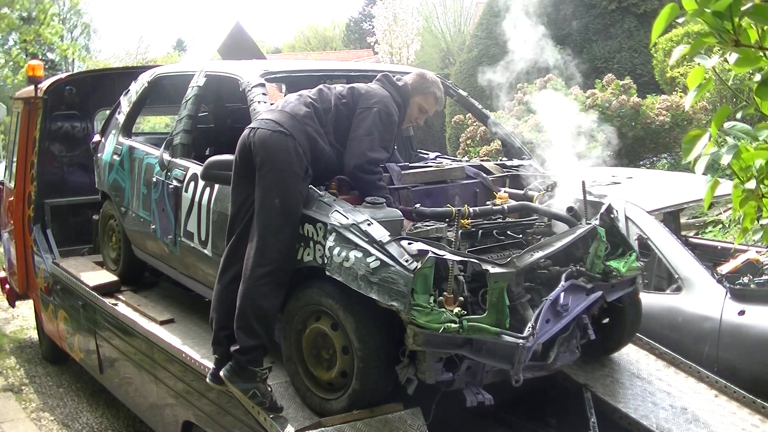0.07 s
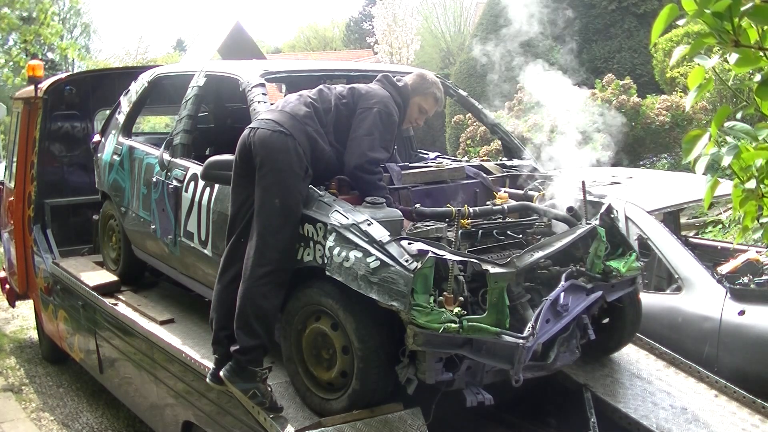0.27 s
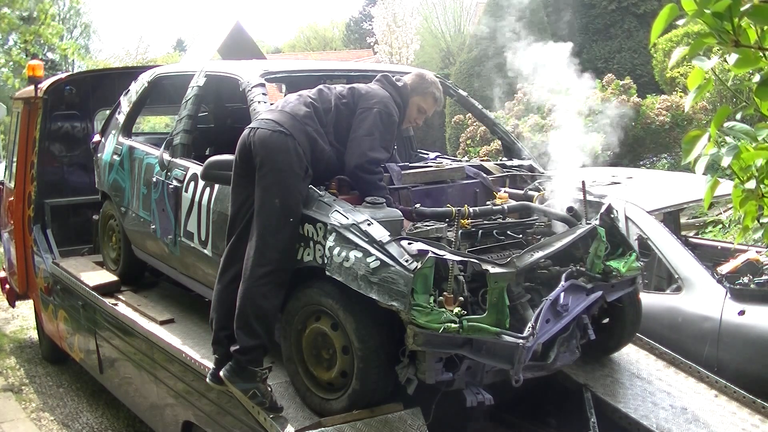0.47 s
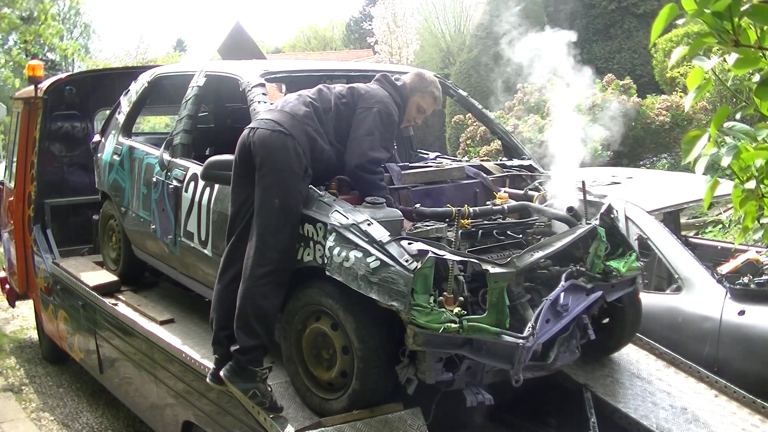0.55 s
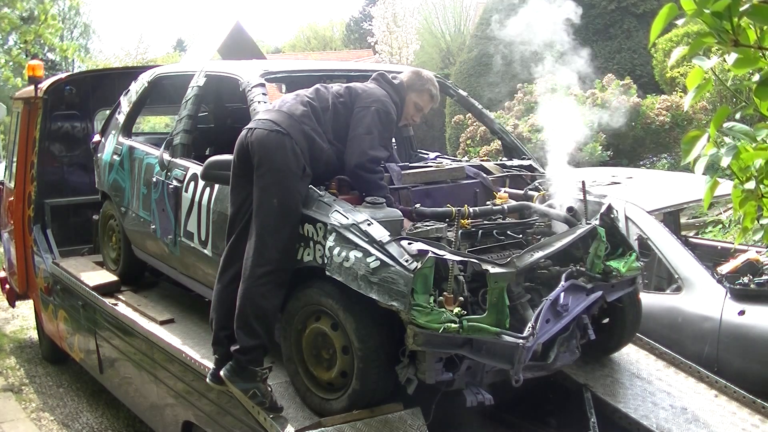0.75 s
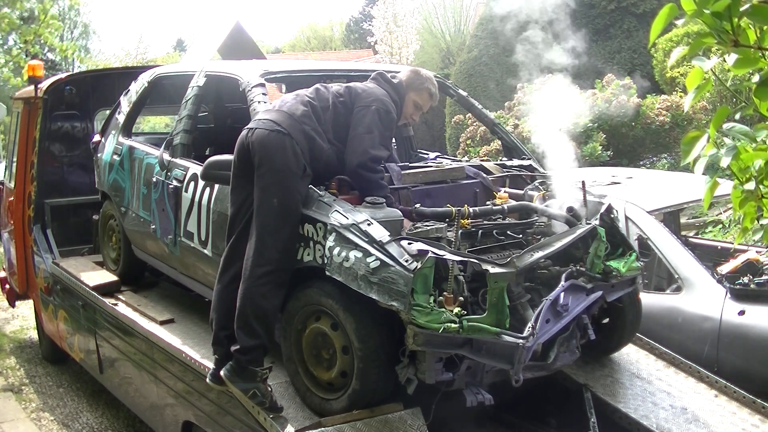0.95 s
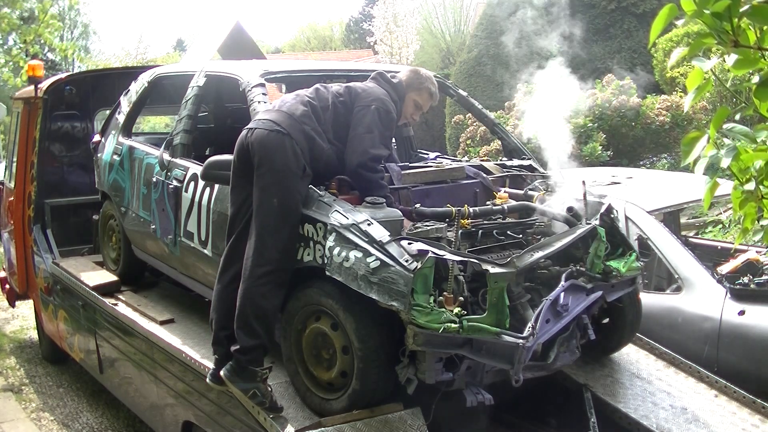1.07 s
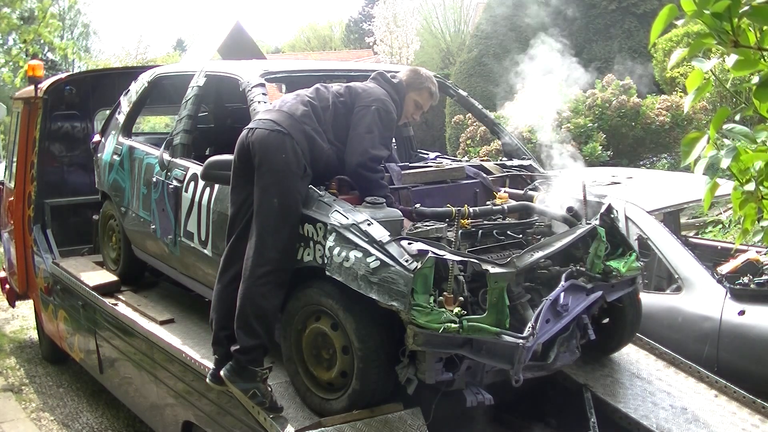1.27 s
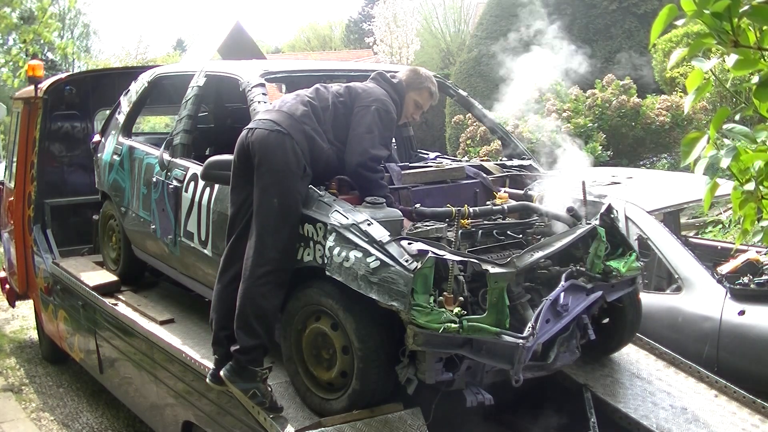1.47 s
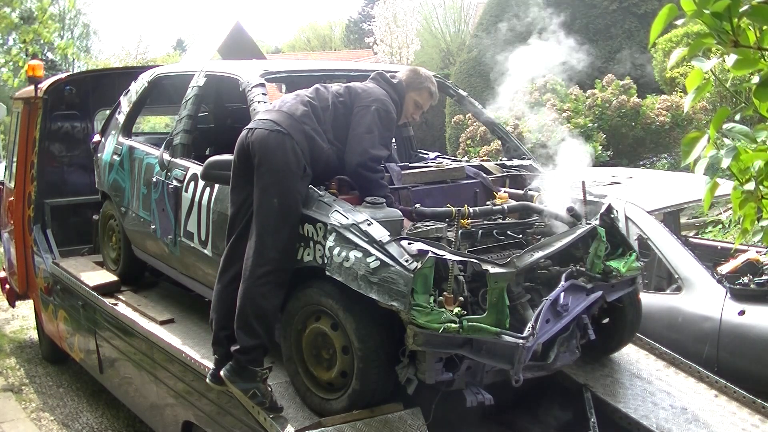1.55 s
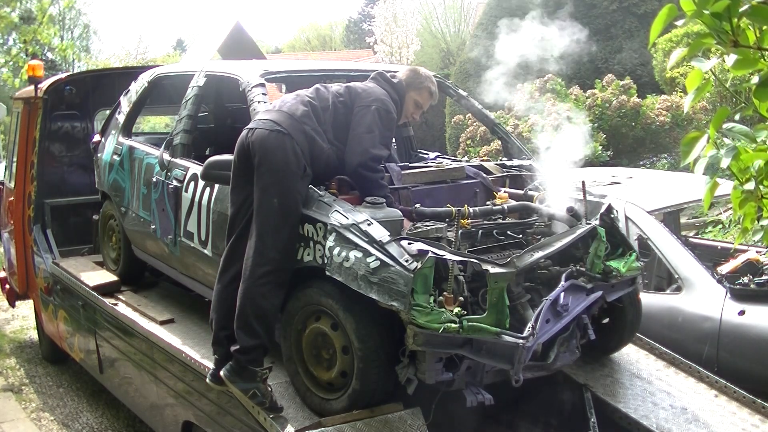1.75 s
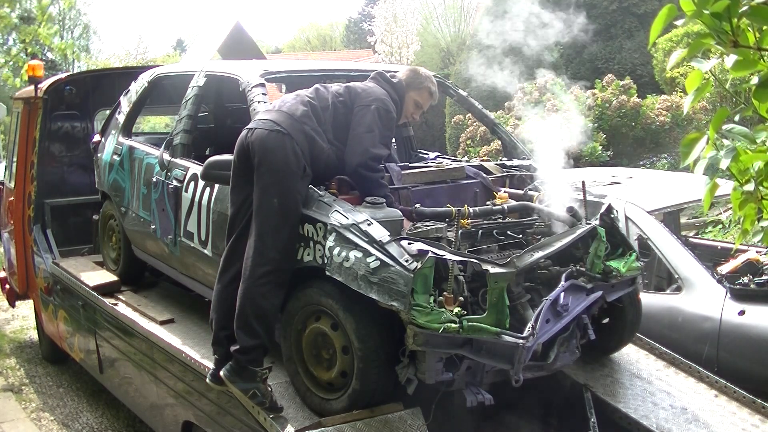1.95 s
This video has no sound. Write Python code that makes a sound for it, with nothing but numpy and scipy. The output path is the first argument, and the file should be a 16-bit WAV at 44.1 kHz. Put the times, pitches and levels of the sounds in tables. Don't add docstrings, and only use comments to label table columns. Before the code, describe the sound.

A worn car engine is cranked without catching. Quiet outdoor air until 0.2 s, when the starter gear slams in with a hard bright crack. From 0.35 s to about 1.6 s, uneven bursts of tooth scraping, dull block clanks, hard blows and brief squeals ride over a low labouring whirr and soft compression thuds. The clatter weakens, nearly dropping away around 1.9 s, then faintly resumes. Slight yard echo, close stereo.

```python
import sys
import numpy as np
from scipy import signal
from scipy.fft import rfft, irfft, next_fast_len
from scipy.io import wavfile
from scipy.ndimage import uniform_filter1d, map_coordinates

SR = 44100
rng = np.random.default_rng(int(sys.argv[2]) if len(sys.argv) > 2 else 0)


def to_linear_factor(level_db):
    exponent = np.asarray(level_db, float) / 20
    return 10 ** exponent


def file_out(sig):
    cols = np.atleast_2d(sig).T
    lim = np.clip(cols, -1, 1)
    pcm = np.round(lim * 32767).astype(np.int16)
    wavfile.write(sys.argv[1], SR, pcm)


N = 88200
T = np.arange(N) / SR


def unit(x):
    return x / np.sqrt(np.mean(x ** 2) + 1e-20)


def along(points, hz):
    f, v = np.transpose(points)
    return np.interp(np.log(hz + 1), np.log(f + 1), v)


def wobble(rate):
    knots = rng.standard_normal(int(N * rate / SR) + 4)
    return map_coordinates(knots, [T * rate])


def filtered(x, response):
    m = next_fast_len(N + SR // 2)
    hz = np.fft.rfftfreq(m, 1 / SR)
    return irfft(rfft(x, m) * response(hz), m)[..., :N]


def coloured(x, colour):
    return filtered(x, lambda hz: to_linear_factor(along(colour, hz)))


def shape(t, rise, hold, t60):
    release = np.clip(t - rise - hold, 0, None)
    return np.clip(t / rise, 0, 1) * to_linear_factor(-60 * release / t60)


def rattle(count, rate, spread_db, smooth):
    chance, sign, size = rng.random((3, count, SR // 2))
    hits = (chance < rate / SR) * np.sign(sign - .5) * to_linear_factor(spread_db * np.sqrt(12) * size)
    return unit(unit(hits) + smooth * rng.standard_normal(hits.shape))


def metal_body(colour, peaks, vary_db, modal_db, m):
    hz = np.fft.rfftfreq(m, 1 / SR)
    lift = sum((g + vary_db * rng.standard_normal()) / (1 + (2 * (hz - c) / w) ** 2) for c, w, g in peaks)
    dense_modes = map_coordinates(rng.standard_normal(400), [hz / 60])
    level_db = along(colour, hz) + lift + modal_db * dense_modes
    cepstrum = irfft(np.log(to_linear_factor(level_db) + 1e-6), m)
    cepstrum[1:m // 2] *= 2
    cepstrum[m // 2 + 1:] = 0
    body = np.exp(rfft(cepstrum))
    return body / np.sqrt(np.mean(abs(body) ** 2))


def struck(events, colour, peaks, rate, spread_db, smooth, vary_db, modal_db):
    m = SR // 2
    out = np.zeros(N + m)
    bursts = rattle(len(events), rate, spread_db, smooth)
    for (s, db, rise, hold, t60), burst in zip(events, bursts):
        body = metal_body(colour, peaks, vary_db, modal_db, m)
        contact = burst * shape(T[:m], rise, hold, t60)
        start = round(s * SR)
        out[start:start + m] += to_linear_factor(db) * irfft(rfft(contact) * body, m)
    return out[:N]


# (time [s], level [dB], rise [s], hold [s], t60 [s])
SLAM_HITS = [
    (.203, -19.5, 0.00074, 0.0052, 0.054),
    (.2115, -15, 0.00044, 0.0049, 0.15),
]
# (frequency [Hz], density [dB per Hz])
SLAM_TONE = [(1530, -40), (2600, -9), (3500, -8.5), (4870, 4.5), (6940, -15), (9820, -17.5), (11200, -31),
             (15800, -37)]


def slam():
    return struck(SLAM_HITS, SLAM_TONE, [], 1500, spread_db=2.5, smooth=.9, vary_db=0, modal_db=2)


# (time [s], level [dB], rise [s], hold [s], t60 [s])
TOOTH_SCRAPES = [(.346, -27, 0.00065, 0.0041, 0.12), (.375, -29, 0.0051, 0.023, 0.31),
                 (.562, -26.5, 0.0019, 0.052, 0.14), (.61, -31, 0.013, 0.062, 0.41),
                 (.702, -23, .004, 0.01, 0.55), (.822, -22.5, 0.0025, 0.021, 0.24),
                 (.953, -33.5, 0.0034, 0.033, 0.07), (.995, -27, 0.002, 0.047, 0.23),
                 (1.02, -25.5, 0.005, 0.0091, .2), (1.125, -35.5, 0.004, 0.036, 0.16),
                 (1.167, -25, 0.0033, 0.061, 0.36), (1.275, -23.5, 0.0035, 0.039, 0.44),
                 (1.396, -20.5, 0.0015, 0.0093, 0.39), (1.495, -22, 0.0012, 0.004, 0.094),
                 (1.541, -33, 0.00081, 0.0066, 0.049), (1.6, -28, 0.072, 0.014, 0.11),
                 (1.66, -32, 0.0084, 0.022, 0.42), (1.892, -37.5, 0.019, 0.0089, 0.15),
                 (1.96, -36, 0.033, 0.019, 0.17), (1.975, -34.5, 0.018, 0.018, .2),
                 (.27, -34.5, 0.014, 0.06, .2)]
# (frequency [Hz], density [dB per Hz])
TEETH_TONE = [(1500, -38), (2600, -6.5), (4800, 1), (6600, -7.5), (7300, -12.5), (10200, -17),
              (11000, -30.5), (15800, -39.5)]
# (frequency [Hz], width [Hz], lift [dB])
TEETH_MODES = [(4330, 110, -3), (3900, 93, 7)]


def scrapes():
    return struck(TOOTH_SCRAPES, TEETH_TONE, TEETH_MODES, 3000,
                  spread_db=0.5, smooth=1.0, vary_db=3.5, modal_db=3.0)


# (time [s], level [dB], rise [s], hold [s], t60 [s])
BLOCK_CLANKS = [(.203, -20, 0.009, 0.0059, 0.29), (.342, -18, 0.0024, 0.015, 0.13),
                (.375, -30.5, .01, 0.028, 0.45), (.565, -26.5, 0.0017, 0.043, 0.063),
                (.607, -24.5, 0.0033, 0.044, 0.43), (.655, -19.5, 0.015, 0.013, 0.26),
                (.705, -24, 0.0057, 0.0095, 0.75), (.815, -26, 0.0027, 0.026, 0.07),
                (.84, -26, 0.008, 0.028, 0.21), (.958, -32.5, 0.0022, 0.04, 0.037),
                (.996, -24.5, 0.0024, 0.032, 0.063), (1.035, -17.5, 0.0075, 0.03, 0.24),
                (1.17, -25.5, 0.0046, 0.04, 0.19), (1.226, -20, 0.0016, 0.012, 0.24),
                (1.28, -24.5, 0.0081, 0.053, 0.3), (1.318, -26, 0.0023, 0.0079, 0.33),
                (1.396, -23.5, 0.0016, 0.017, 0.4), (1.488, -27.5, 0.0013, 0.0035, 0.13),
                (1.541, -29, 0.0017, 0.0053, 0.15), (1.6, -30, 0.02, 0.063, 0.38),
                (1.728, -34.5, 0.00089, 0.013, 0.15), (1.798, -37, 0.0021, 0.0069, 0.073),
                (1.944, -35.5, 0.0081, .05, 0.075)]
# (frequency [Hz], density [dB per Hz])
BLOCK_TONE = [(88, -61), (150, -29.5), (500, -8), (641, -24.5), (811, -8), (953, -4.5), (1090, -7),
              (1820, 4), (5000, -11), (6500, -19), (11000, -120)]
# (frequency [Hz], width [Hz], lift [dB])
BLOCK_MODES = [(842, 90, 4.9), (1089, 37, 11.6), (1420, 47, 0.87), (1500, 130, 4.6), (1713, 27, 7.5),
               (2110, 71, 5.9), (2690, 190, 3.3)]


def clanks():
    return struck(BLOCK_CLANKS, BLOCK_TONE, BLOCK_MODES, 1500,
                  spread_db=1.5, smooth=0.78, vary_db=1.64, modal_db=3.5)


def shimmer(x):
    depth_db = 0.5
    z = signal.stft(x, nperseg=256)[2]
    patches = uniform_filter1d(rng.standard_normal(z.shape), size=2, axis=0)
    patches = unit(uniform_filter1d(patches, size=6, axis=1))
    gain_db = depth_db * patches - depth_db ** 2 / 2.7
    return signal.istft(z * to_linear_factor(gain_db), nperseg=256)[1][:N]


# (time [s], peak level [dB], pitch [Hz])
HARD_BLOWS = [(0.2125, -4.5, 3700), (0.2128, -0.5, 4820), (0.2158, -7, 4620), (0.2196, -9, 1990),
              (.2222, -5, 4270), (.2252, -12, 3900), (0.3446, -4, 2460), (0.35, -9.5, 1500),
              (.3533, -14, 2200), (.3583, -13, 4860), (.3615, -12, 2340), (0.383, -15, 2370),
              (0.659, -9, 1820), (0.667, -9, 1540), (0.667, -12, 2480), (.673, -11, 1660),
              (.679, -10, 2720), (0.683, -9.5, 2730), (0.695, -12.5, 1370), (1.044, -11, 2570),
              (1.0485, -9.5, 1350), (1.053, -10, 2030), (1.0611, -10, 1330), (1.065, -10, 2470),
              (1.069, -19, 2004), (1.0742, -10, 1280), (1.086, -17.5, 2250), (1.175, -14.5, 4800),
              (1.2271, -12, 1760), (1.282, -11.5, 2180), (1.32, -12, 2040), (1.397, -13.5, 1640),
              (1.416, -11, 2730), (1.4894, -7, 2480), (1.4928, -12, 2800), (1.498, -9, 4870),
              (1.5431, -13.5, 3280), (1.5456, -20, 1760), (1.5514, -14, 4470), (1.728, -20.5, 1710),
              (1.9462, -32, 1680), (1.985, -23.5, 3400), (1.994, -20, 2720)]


def blows():
    gain_db, crack_db, crack_t60 = -0.98, -15.01, .004
    ring_cycles, overtone, overtone_db = 26, 1.27, -5
    out, t = np.zeros(N + SR), T[:SR // 20]
    for s, db, hz in HARD_BLOWS:
        ring = np.sin(2 * np.pi * hz * t) + to_linear_factor(overtone_db) * np.sin(2 * np.pi * overtone * hz * t)
        ring = ring * shape(t, 0.00098, 0, ring_cycles / hz)
        crack = to_linear_factor(crack_db - 60 * t / crack_t60) * rng.standard_normal(len(t))
        start = round(s * SR)
        out[start:start + len(t)] += to_linear_factor(db + gain_db) * (ring + crack)

    def radiation(hz):
        return (1j * hz / (700 + 1j * hz)) ** 3 / (1 + 1j * hz / 7000) ** 2

    return filtered(out[:N], radiation)


# (time [s], pitch [Hz], level [dB], hold [s], t60 [s])
RINGING_PARTS = [(0.6, 3940, -24.5, 0.015, 0.028), (0.84, 1500, -22, 0.012, 0.069),
                 (0.84, 3900, -27.5, 0.012, 0.042), (0.95, 2600, -34, 0.023, 0.038),
                 (0.97, 1810, -15.5, 0.0087, 0.047), (0.998, 2700, -25, 0.016, 0.19),
                 (1.244, 6970, -22.5, 0.013, 0.022), (1.271, 6870, -23, 0.012, 0.078),
                 (1.485, 2750, -19, 0.0086, 0.055), (1.489, 1270, -22.5, 0.0027, 0.12),
                 (.66, 1100, -25.5, 0.034, 0.088), (.83, 1095, -31.5, 0.021, 0.072),
                 (1.95, 950, -40, 0.034, .1), (.345, 845, -32.5, 0.02, 0.11),
                 (1.04, 840, -29.5, 0.035, .12), (.812, 1500, -27, 0.011, .04),
                 (.835, 2060, -26.5, 0.017, 0.046), (1.4, 1620, -27.5, 0.027, .08),
                 (0.82, 1540, -27.5, 0.027, .06), (1.723, 1700, -34.5, .035, 0.047),
                 (0.341, 2600, -28, .006, .04), (1.722, 4800, -38, 0.031, 0.15)]


def rings():
    rise_s, wander_hz, rough_db = .004, 32, 3.5
    out = np.zeros(N)
    for s, hz, db, hold, t60 in RINGING_PARTS:
        level = to_linear_factor(db + rough_db * wobble(260)) * shape(T - s, rise_s, hold, t60)
        phase = 2 * np.pi * np.cumsum(hz + wander_hz * wobble(200)) / SR
        out += level * np.sin(phase)
    return out


# (time [s], level [dB], pitch
# [Hz])
LOW_THUDS = [(.37, -44.5, 370), (0.636, -51, 110), (0.664, -39.5, 260), (.79, -60, 110),
             (1.23, -58, 105), (1.334, -55.5, 128), (1.67, -38, 341), (.345, -41, 560),
             (.665, -41, 600), (.67, -48, 180), (1.04, -37.5, 490), (.87, -42, 545),
             (1.05, -44, 400), (.72, -46, 235), (1.37, -48, 254)]


def thuds():
    sag, t60 = 1.27, .22
    out = np.zeros(N)
    for s, db, hz in LOW_THUDS:
        t = T - s
        level = to_linear_factor(db + 2.8 * wobble(51.15)) * shape(t, 0.0029, 0.0068, t60)
        out += level * np.sin(2 * np.pi * hz * t * (1 - sag * np.clip(t, 0, .2)))
    return out


# (time [s], level [dB])
STARTER_EFFORT = [(.2, -52), (.23, -44), (.55, -39), (.68, -45), (1.5, -43), (1.6, -44.5), (1.75, -42),
                  (1.862, -53), (1.92, -58), (1.96, -45), (2, -42)]
# (frequency [Hz], density [dB per Hz])
DRONE_TONE = [(24, -60), (40, -55), (151, -34), (318, -2), (400, -9), (480, -2.5), (525, 3), (575, -10),
              (700, -9.5), (910, -47), (1540, -120)]


def whirr():
    mesh_db = 5
    drone = coloured(rng.standard_normal(N) * to_linear_factor(2.8 * wobble(41.04)), DRONE_TONE)
    friction = rng.standard_normal(N) * to_linear_factor(1.8 * wobble(62.2))
    mesh = coloured(friction, BLOCK_TONE) + 0.4 * coloured(friction, TEETH_TONE)
    s, db = np.transpose(STARTER_EFFORT)
    effort = to_linear_factor(np.interp(T, s, db, left=-120) - 2.5)
    return effort * (unit(drone) + to_linear_factor(mesh_db) * unit(mesh))


# (frequency [Hz], t60 [s])
YARD_DECAY = [(300, 0.96), (10000, 0.5)]


def yard(x):
    hz, t, z = signal.stft(rng.standard_normal(SR // 2), SR, nperseg=256)
    decay = to_linear_factor(-60 * t / along(YARD_DECAY, hz)[:, None])
    tail = signal.istft(z * decay, SR, nperseg=256)[1]
    return signal.fftconvolve(x, tail / np.linalg.norm(tail))[:N]


# (frequency [Hz], density [dB per Hz])
AIR_TONE = [(35, -42), (60, -34), (107, -26), (130, -11.5), (200, -7), (663, -12), (2130, -2),
            (7400, -15.5), (8400, -22.5), (15800, -31)]


def floor():
    return to_linear_factor(-48.5 + 1.3 * wobble(33)) * unit(coloured(rng.standard_normal(N), AIR_TONE))


# (frequency [Hz], difference [dB])
PORT_LEVELS = [(60, 2), (200, 5), (1200, 2), (2700, 0), (3300, -3.5), (4300, -.6), (5500, -4), (6600, 4),
               (10000, 0)]
# (frequency [Hz], lead [rad])
PORT_PHASES = [(300, 0), (1200, -.17), (2750, -.5), (3800, 0), (5300, -.26), (6000, .45), (7000, 0),
               (9000, -.4)]
# (frequency [Hz], level [dB])
PORT_SCATTER = [(100, -26), (400, -18), (2800, -16), (4300, -20), (5800, -7), (8000, -9), (10000, -12),
                (13000, 3)]


def ports(x):
    side = np.array([[.5], [-.5]])
    z = signal.stft(x, nperseg=256)[2]
    random_phase = np.exp(2j * np.pi * rng.random((2, *z.shape)))
    unlike = np.sqrt(2) * signal.istft(z * random_phase, nperseg=256)[1][:, :N]

    def share(hz):
        return to_linear_factor(along(PORT_SCATTER, hz))

    def lean(hz):
        return to_linear_factor(side * along(PORT_LEVELS, hz)) / np.sqrt(1 + share(hz) ** 2)

    def alike_response(hz):
        return lean(hz) * np.exp(1j * side * along(PORT_PHASES, hz))

    alike = filtered(np.array([x, x]), alike_response)
    return alike + filtered(unlike, lambda hz: lean(hz) * share(hz))


def scene():
    clatter = shimmer(scrapes() + clanks())
    engine = slam() + clatter + blows() + rings() + whirr() + thuds()
    echo_db, mic_low_hz = -15, 110
    heard = engine + to_linear_factor(echo_db) * yard(engine)
    heard = filtered(heard, lambda hz: 1j * hz / (mic_low_hz + 1j * hz))
    return ports(heard + floor())


def band_limit(x):
    return signal.sosfilt(signal.butter(12, 15830, fs=SR, output="sos"), x)


def record(dry):
    limited = filtered(dry, lambda hz: hz < 15830)
    return band_limit(limited)


dry = scene()
out = record(dry)
file_out(out)
```